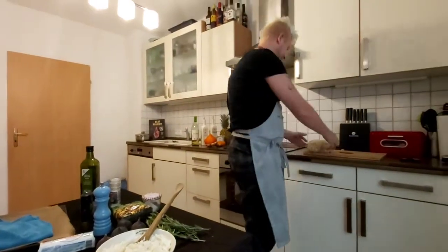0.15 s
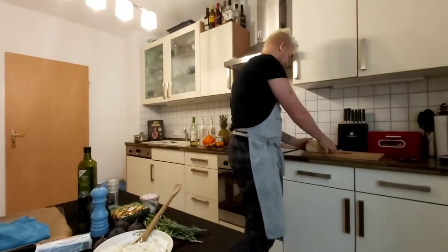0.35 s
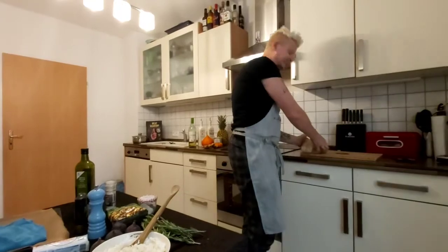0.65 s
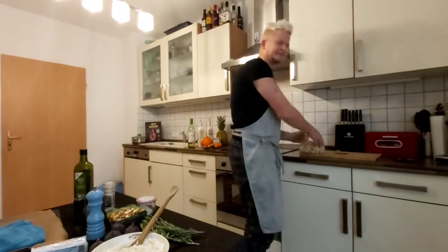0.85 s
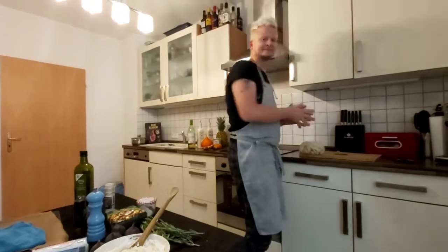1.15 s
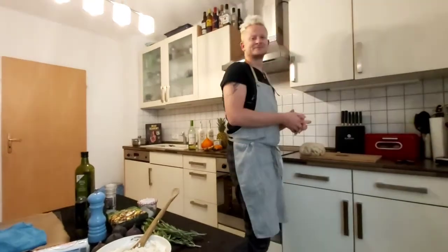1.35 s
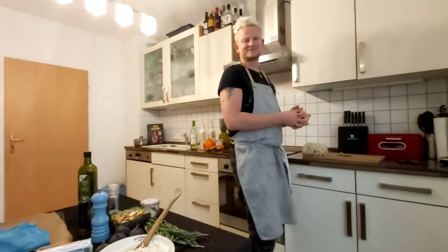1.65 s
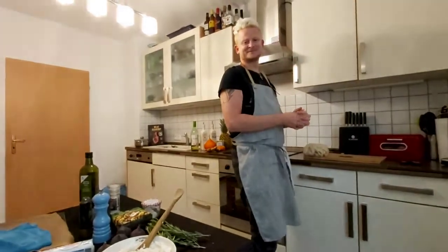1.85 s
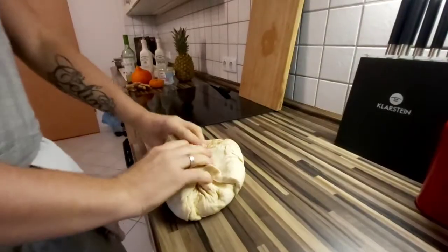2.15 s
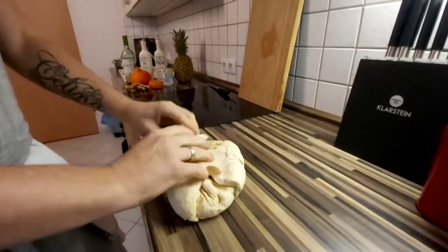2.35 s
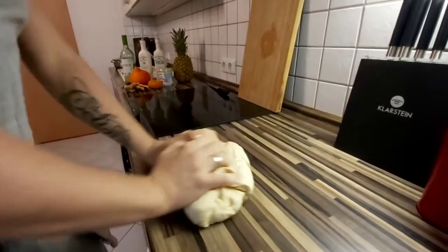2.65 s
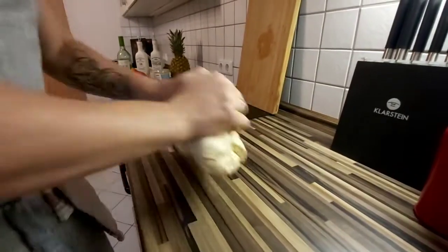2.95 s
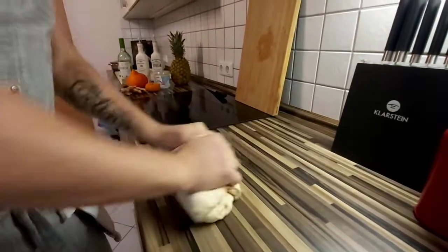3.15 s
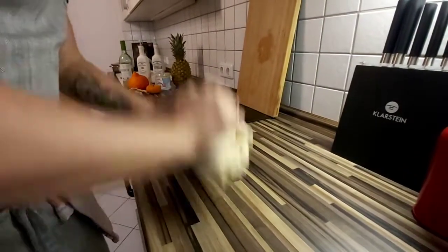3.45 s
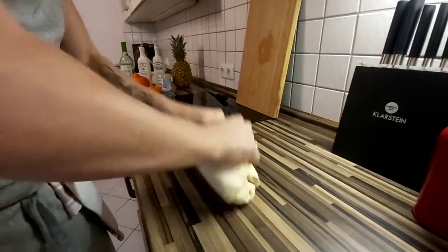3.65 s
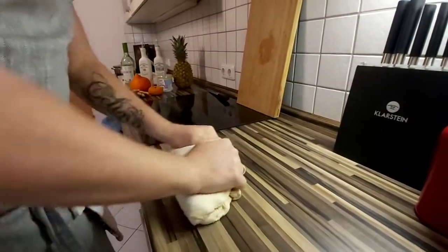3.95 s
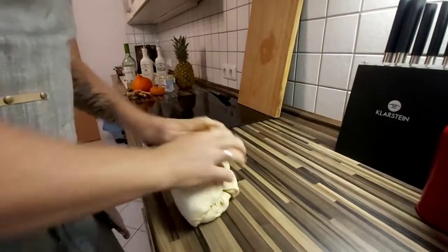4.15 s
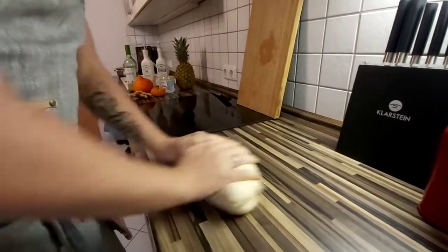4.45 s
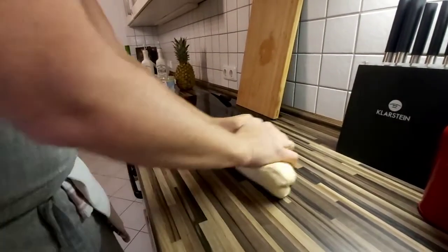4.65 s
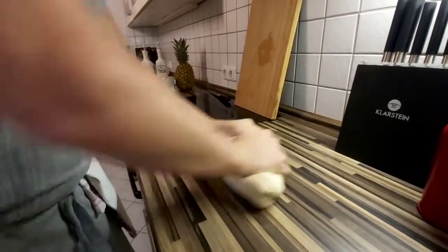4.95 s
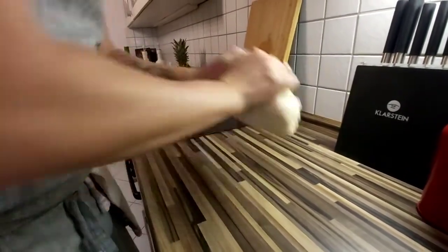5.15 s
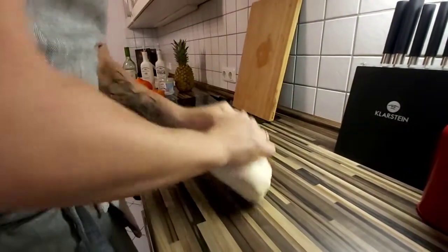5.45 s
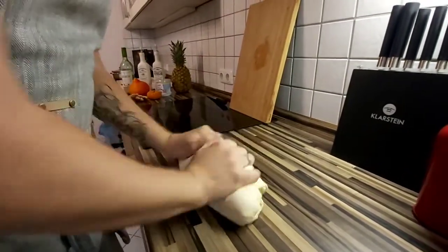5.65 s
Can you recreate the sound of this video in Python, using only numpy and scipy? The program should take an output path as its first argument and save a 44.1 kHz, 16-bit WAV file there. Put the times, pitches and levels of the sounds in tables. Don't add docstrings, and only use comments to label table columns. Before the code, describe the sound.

Distant quiet room tone with a narrow whirr and tiny sticky snaps, then an abrupt change to a close microphone on hollow wood. Fridge hum and soft skin friction lead into two violent dough slams and a softer double-tap rebound. After sticky rubbing come a hard slam and a duller one. Cracks are sharp, thumps heavy, tails tiled and roomy; the hum dips after each hit.

```python
import sys
import numpy as np
from scipy import signal
from scipy.fft import rfft, irfft
from scipy.io import wavfile
from scipy.ndimage import uniform_filter1d

SR = 44100
rng = np.random.default_rng(int(sys.argv[2]) if len(sys.argv) > 2 else 0)


def master_out(mix):
    frames = np.transpose(np.atleast_2d(mix))
    ceiling = np.clip(frames, -1, 1)
    pcm = np.round(ceiling * 32767).astype(np.int16)
    wavfile.write(sys.argv[1], SR, pcm)


def how_loud(loudness_db):
    steps = np.asarray(loudness_db, float) / 20
    return 10 ** steps


N = 255074
CUT_S = 2.312


def rms_one(x):
    return x / np.sqrt(np.mean(x ** 2) + 1e-20)


def in_time(rows):
    s, value = np.transpose(rows)
    return np.interp(np.arange(N) / SR, s, value)


def at_hz(points, hz):
    point_hz, value = np.array(points).T
    return np.interp(np.log(hz), np.log(point_hz), value)


def drift(rate):
    r = np.exp(-80 * np.pi * rate / SR)
    slow = signal.lfilter([1], [1, -2 * r, r * r], rng.standard_normal(N // 40 + 2002))[2000:]
    return np.interp(np.arange(N) / 40, np.arange(len(slow)), rms_one(slow))


def sides(pan_db):
    return how_loud(np.array([pan_db / 2, -pan_db / 2]))


# frequency in Hz, left-right likeness from 0 to 1.
LIKENESS = [(60, 0.43), (180, 0.91), (550, 0.67), (1650, 0.046), (4970, 0.2), (15000, -0.01)]


def stereo_noise(spectrum, size, apart=0.81):
    hz = np.fft.rfftfreq(size, 1 / SR) + 1
    alike = np.clip(1 - apart * (1 - at_hz(LIKENESS, hz)), 0, 1)
    mid, side = rfft(rng.standard_normal((2, size)))
    both = np.sqrt(1 + alike) * mid + np.sqrt(1 - alike) * side * [[1], [-1]]
    outside_db = -60 * ((hz < spectrum[0][0]) | (hz > spectrum[-1][0]))
    return rms_one(irfft(both * how_loud(at_hz(spectrum, hz) + outside_db), size))


def add(out, at_s, sound):
    i = round(at_s * SR)
    out[:, i:i + sound.shape[1]] += sound[:, :N - i]


def band_limit(x):
    return signal.sosfilt(signal.cheby2(12, 40, 14750, fs=SR, output="sos"), x)


# start in seconds, peak in dB, boom in dB, wash in dB, contact time in seconds.
SLAMS = [
    (3.1720, -3, -13, -17, 0.0018),
    (3.5823, -0.5, -12, -17.5, 0.0011),
    (3.9393, -9.5, -15, -31, 0.005),
    (3.9525, -7, -25, -49, 0.0017),
    (5.3850, -0.5, -12.5, -15, 0.0012),
    (5.7214, -2, -15, -26.5, 0.0039),
]
# start in seconds, boom in dB, contact time in seconds.
NUDGES = [(0.526, -51.5, 0.0018), (0.618, -58, 0.0018), (0.763, -50, 0.0033), (2.31, -41, 0.0027),
          (2.79, -60, 0.0035), (4.27, -48, 0.0038), (5.174, -50, 0.0073)]
SLAM_TILT_DB = 0.99
DULL_BELOW_DB, DULLING = -17.5, 0.47
CABINET_DB = 5


def slams():
    out, t = np.zeros((2, N)), np.arange(32768) / SR
    fade = np.clip(8 * (t[-1] - t), 0, 1)
    for s, peak_db, boom_db, wash_db, contact_s in SLAMS:
        tilt_db = SLAM_TILT_DB + DULLING * min(boom_db - DULL_BELOW_DB, 0)
        body = deep(boom_db, contact_s, t) + boom(boom_db + CABINET_DB, contact_s, t)
        tail = band_limit(wash(wash_db, tilt_db, t))
        add(out, s, fade * (crack(peak_db, contact_s, tilt_db, t) + body + tail))
    for s, boom_db, contact_s in NUDGES:
        add(out, s, fade * deep(boom_db, contact_s, t))
    return out


# frequency in Hz, level in dB per Hz.
CRACK = [(300, 1.5), (1000, 7.5), (2000, 4), (3200, 3.5), (4600, 2), (6500, -13), (9000, -19), (13000, -9),
         (15500, -24.5), (16300, -39)]
# frequency in Hz, left minus right in dB.
CRACK_SIDE = [(1000, 19), (4000, 0.5), (7000, 40.5), (13000, 15)]
PUSH_S = 0.0003
REBOUND, REBOUND_S = 0.36, 0.0019


def crack(peak_db, length_s, tilt_db, t):
    burst = rng.standard_normal(len(t)) * t * np.exp(-t / (0.6 * length_s))
    hz = np.fft.rfftfreq(len(t), 1 / SR) + 1
    colour = how_loud(at_hz(CRACK, hz) + 1.2 * tilt_db * np.log2(hz / 1000)) * sides(at_hz(CRACK_SIDE, hz))
    sharp = irfft(rfft(burst) * colour, len(t))
    push = -t / PUSH_S * np.exp(1 - t / PUSH_S)
    back = (t / REBOUND_S) ** 2 * np.exp(2 - 2 * t / REBOUND_S)
    return how_loud(peak_db) * (0.57 * sharp / np.abs(sharp).max() + 0.57 * push + REBOUND * back)


# frequency in Hz, level in dB,
# t60 in seconds, sense of the first swing (+1 or -1), fed through the air (0 or 1).
DEEP = [(44, -24, .95, 1, 1), (58, -13, .75, 1, 0), (71, 1.5, .28, -1, 1), (93, 7, .14, -1, 0),
        (104, -3, .5, 1, 0), (111, 0.1, .51, 1, 1), (122, -5.5, 1.04, 1, 1), (131, -21, 1.2, 1, 1)]
DEEP_LAG_S = 0.0028
LANDING_DB = 1.2


def deep(level_db, contact_s, t):
    hz, db, t60, sense, by_air = np.transpose(DEEP)[:, :, None]
    spot_db, lean_db = rng.standard_normal((2, len(DEEP), 1))
    soft_db = -3.0 * np.log2(contact_s / 0.0012) * np.log2(hz / 80)
    since = np.maximum(t - by_air * DEEP_LAG_S, 0)
    level = how_loud(db + soft_db + LANDING_DB * spot_db - 60 * since / t60)
    rings = sense * level * np.sin(2 * np.pi * hz * since)
    onset = 1 - np.exp(-t / 0.0034)
    return how_loud(level_db) * (sides(3.3 * lean_db - 0.7) * rings).sum(axis=1) * onset


# frequency in Hz, level in dB, t60 in seconds.
BOOM = [(165, -24, .5), (193, -17, .5), (201, -16, .55), (208, -15, .55), (216, -14, .55), (226, -12, .55),
        (240, -16, .55), (249, -11, .55), (255, -12, .5), (270, -14, .55), (280, -12, .55), (293, -10, .55),
        (308, -9, .65), (325, -15, .55), (336, -12, .6), (370, -17, .5), (387, -19, .5), (405, -17, .5),
        (424, -18, .45), (447, -20, .45), (655, -20, .55), (663, -20, .55)]
IN_STEP_S = 0.016
SWELL_S = 0.0066


def boom(level_db, contact_s, t):
    hz, db, t60 = np.transpose(BOOM)[:, :, None]
    spot_db, lean_db, slip = rng.standard_normal((3, len(BOOM), 1))
    soft_db = -3.0 * np.log2(contact_s / 0.00077) * np.log2(hz / 80)
    level = how_loud(db + soft_db + 1.6 * spot_db - 60 * t / t60)
    rings = level * np.cos(2 * np.pi * hz * (t - IN_STEP_S) + 1.33 * slip)
    return how_loud(level_db) * (sides(5.3 * lean_db) * rings).sum(axis=1) * (1 - np.exp(-t / SWELL_S))


# frequency in Hz, level in dB per Hz.
WASH = [(140, -12.5), (200, -1.5), (330, -2), (387, -7), (432, -6), (482, -7), (522, -9), (764, -9.5),
        (1230, -20.5), (1530, -18.5), (4020, -24.5), (7460, -33), (9020, -40), (11800, -33), (14500, -36)]
# frequency in Hz, t60 in seconds.
WASH_T60 = [(200, 0.67), (530, 0.77), (1390, 0.78), (3680, 0.6), (8000, 0.48), (11000, 0.45), (14500, 0.34)]
WASH_RISE_S = 0.0029
TREBLE_GATE_DB, GATE_FROM_HZ = 25, 8000


def wash(level_db, tilt_db, t):
    noise, out = rfft(stereo_noise(WASH, len(t), apart=1.56)), 0
    octaves = np.log2(np.fft.rfftfreq(len(t), 1 / SR) + 1)
    for centre in np.arange(7.1, 14.1, 1 / 5):
        band = irfft(noise * np.clip(1 - 5 * abs(octaves - centre), 0, 1), len(t))
        fallen_db = 60 * t / at_hz(WASH_T60, 2 ** centre)
        gate_db = TREBLE_GATE_DB + 7.2 * rng.standard_normal((2, 1))
        lost_db = 2.3 * np.maximum(fallen_db - gate_db, 0) * (2 ** centre > GATE_FROM_HZ)
        out = out + band * how_loud(tilt_db * (centre - 9) - fallen_db - lost_db)
    return how_loud(level_db) * out * (1 - np.exp(-t / WASH_RISE_S))


# start in seconds,
# peak in dB, pitch in Hz.
POCKETS = [(3.1726, -16.5, 4130), (3.1728, -27, 13500), (3.556, -48, 4600), (3.556, -48, 7700),
           (3.5824, -21, 7300), (3.5838, -22, 4100), (3.5832, -22, 11500), (3.5836, -21, 13800),
           (5.723, -15, 4900)]
POCKET_T60_S, POCKET_PAN_DB = 0.01, 10


def pockets():
    out, t = np.zeros((2, N)), np.arange(1200) / SR
    for s, peak_db, hz in POCKETS:
        ring = how_loud(peak_db - 60 * t / POCKET_T60_S) * np.sin(2 * np.pi * hz * t)
        add(out, s, sides(POCKET_PAN_DB)[:, None] * ring)
    return out


# start in seconds, peak in dB, left minus right in dB, pulse width in
# seconds, tearing from 0 to 1.
SNAPS = [(0.7694, -23, -24.5, 0.000053, 0.58), (0.8143, -34, 0, 0.00007, 0.03),
         (2.7948, -21, 27, 0.00017, 0.8), (2.7978, -30, 22, 0.00033, 0), (2.864, -48, -8, 0.00023, .5),
         (2.65, -46, 3, 0.0001, 0.7), (4.323, -66, -15.5, .0002, 0.79), (4.3345, -43, 0, 0.00006, 1),
         (5.116, -38, 1, 0.00022, .6), (5.719, -30, 1.5, .0002, 0.5), (2.921, -39, 5.5, 0.00016, .8),
         (2.3136, -37, 5, 0.00035, .6), (3.582, -44, 5.5, 0.000097, 0.9)]
SHARP_SNAP_DB = -28
SNAP_DAMPING = 2.8


def snaps():
    out, t = np.zeros((2, N)), np.arange(400) / SR
    for s, peak_db, pan_db, width_s, tearing in SNAPS:
        pulse = -np.sin(2 * np.pi * t / (6 * width_s)) * np.exp(-t / (SNAP_DAMPING * width_s))
        tear = tearing * rng.standard_normal(len(t)) * np.exp(-t / 0.0001)
        snap = pulse + tear
        if peak_db <= SHARP_SNAP_DB:
            snap = band_limit(snap)
        add(out, s, how_loud(peak_db + 1.5) * sides(pan_db)[:, None] * snap)
    return out


# frequency in Hz, level in dB per Hz.
DRAG = [(250, -10), (420, -6.5), (528, -8), (583, -14.5), (1100, -15.5), (1540, -14.5), (2600, -17.5),
        (3380, -30.5), (5720, -120)]
RUB = [(1530, -39.5), (2600, -6.5), (3660, -2.5), (3960, 1), (6830, -3.5), (8500, -8), (11000, -29.5),
       (18700, -120)]
HISS = [(5000, -20), (8500, -13.5), (11600, -3), (13900, -3), (14900, -16), (15200, -25), (15500, -69)]


def rubbing():
    drag, rub, hiss = np.array(strokes())
    grain = how_loud(0.37 * drift(90) + 0.9 * drift(14))
    friction = drag * stereo_noise(DRAG, N, apart=2.2)
    friction = friction + rub * stereo_noise(RUB, N, apart=6.6)
    friction = friction + hiss * stereo_noise(HISS, N, apart=2.2)
    return grain * friction


# peak in seconds, rise in seconds, fall in seconds,
# level in dB, lightness in dB (+ fingertips brushing, - palm dragging).
STROKES = [(0.08, 0.098, 0.17, -68, -2), (0.46, 0.11, .1, -72, -4), (0.56, 0.075, .09, -60, -0.5),
           (0.79, 0.093, 0.14, -55, 1), (0.9, 0.09, 0.14, -68, 2), (1.1, 0.15, 0.16, -77.5, -9.5),
           (1.765, 0.13, 0.083, -85.5, 22.5), (2.08, 0.037, 0.094, -79.5, -10.5),
           (2.323, 0.014, 0.21, -62.5, -1), (2.485, 0.079, 0.13, -68, 11.5), (2.64, 0.1, .15, -68, 8),
           (2.765, 0.066, 0.083, -53, 6.5), (2.91, 0.084, 0.074, -49, 1.5), (3.165, 0.026, 0.038, -60.5, 3),
           (3.56, 0.0092, .04, -59, 2), (4.2, 0.14, 0.094, -55.5, 2.5), (4.335, 0.011, 0.025, -60.5, 5),
           (4.5, 0.067, 0.15, -66.5, 13), (4.6, .12, 0.16, -58, 8), (4.861, 0.13, 0.079, -60.5, 9),
           (5.07, 0.16, .14, -58, 5), (5.12, 0.039, 0.038, -54.5, 5.5), (5.36, 0.14, 0.056, -93, -1)]
STROKE_DB, STROKE_ROUND = 23.5, 0.35
DRAG_DB, DRAG_SWING, HISS_DB = 4.5, 0.7, -5.5
HANDS_PAN_DB, LIGHT_PAN = 4, 0.25


def strokes():
    t, power = np.arange(0, N + 64, 64) / SR, 1e-14
    for s, rise_s, fall_s, level_db, light_db in STROKES:
        from_peak = (t - s) / np.where(t < s, rise_s, fall_s)
        down_db = STROKE_DB * (np.hypot(from_peak, STROKE_ROUND) - STROKE_ROUND)
        drag_db = DRAG_DB - light_db - DRAG_SWING * down_db
        hiss_db = HISS_DB + light_db - down_db
        layers = how_loud(level_db + np.array([drag_db, -down_db, hiss_db]))
        pan = sides(HANDS_PAN_DB + LIGHT_PAN * light_db)
        power = power + (layers[:, None] * pan[:, None]) ** 2
    return [[np.interp(np.arange(N) / SR, t, np.sqrt(p)) for p in layer] for layer in power]


# frequency in Hz, level in dB per Hz.
FAR_AIR = [(18, -9), (30, -15.5), (55, 2.5), (71, -34), (102, -5.5), (173, -14.5), (208, -6.5), (277, -8.5),
           (359, -6), (767, -23), (897, -26), (2550, -41), (6050, -44), (14000, -43.5), (15500, -95)]
NEAR_AIR = [(30, -8), (48, 5.5), (75, 0.5), (110, 2), (135, -3), (175, -12), (270, -3), (400, -8.5),
            (450, -18), (800, -21), (1200, -31.5), (2300, -35.5), (7860, -45.5), (14600, -46.5)]
# frequency in Hz, rms in dB.
FAR_HUM = [(49.5, -86), (100, -63), (124, -68.5), (149, -64.5)]
# frequency in Hz, level in dB against the hum level.
NEAR_HUM = [(50, -21), (100, 0.4), (124, -13.5), (300, -18.5)]
# frequency in Hz, level in dB per Hz.
FAN = [(330, 1), (352, 3.5), (362, -12), (372, 7.5), (400, -1)]
# time in seconds, level in dB.
FAN_LEVEL = [(0.0, -57), (0.76, -52), (0.85, -54), (1.0, -90), (1.32, -64), (2.09, -55.5), (2.3, -68)]
FAR_DB, NEAR_AIR_DB, NEAR_HUM_DB = -52, -47.5, -42
AIR_FOLLOWS = 0.58


def background():
    gain_db = gain_control()
    fan = how_loud(in_time(FAN_LEVEL)) * stereo_noise(FAN, N)
    far_air = how_loud(FAR_DB + 0.7 * drift(2.5)) * stereo_noise(FAR_AIR, N, apart=1.1)
    far = fan + far_air + hum(FAR_HUM, wander_db=0.6)
    near_air_db = NEAR_AIR_DB + AIR_FOLLOWS * gain_db + 0.56 * drift(3.6)
    near_air = how_loud(near_air_db) * stereo_noise(NEAR_AIR, N, apart=1.6)
    near = near_air + how_loud(NEAR_HUM_DB + gain_db) * hum(NEAR_HUM, wander_db=1.2)
    return np.where(np.arange(N) < CUT_S * SR, far, near)


def hum(lines, wander_db):
    t, out = np.arange(N) / SR, 0
    for hz, db in lines:
        level = np.sqrt(2) * how_loud(db + wander_db * drift(3.7))
        out = out + level * np.sin(2 * np.pi * (hz * t + rng.random()))
    return out


DUCK_DB, RECOVER_DB_PER_S = -9, 5.5


def gain_control():
    t = np.arange(N) / SR
    gain_db = RECOVER_DB_PER_S * (t - CUT_S)
    for s, *_ in SLAMS:
        gain_db = np.where(t > s, DUCK_DB + RECOVER_DB_PER_S * (t - s), gain_db)
    return uniform_filter1d(gain_db, size=900)


def scene():
    return slams() + pockets() + snaps() + band_limit(rubbing() + background())


def roll_off(x):
    return signal.sosfilt(signal.butter(12, 15660, fs=SR, output="sos"), x)


def record(dry):
    cut = signal.sosfiltfilt(signal.butter(3, 40, "high", fs=SR, output="sos"), dry)
    mix = 1.695 * np.tanh(cut / 1.875)
    return roll_off(mix)


dry = scene()
out = record(dry)
master_out(out)
```